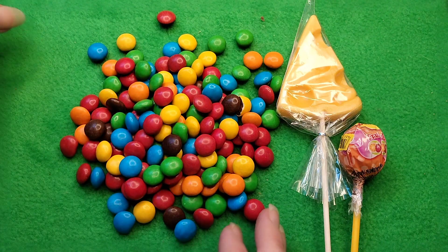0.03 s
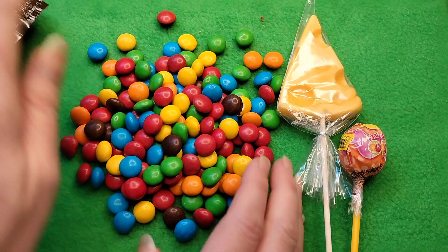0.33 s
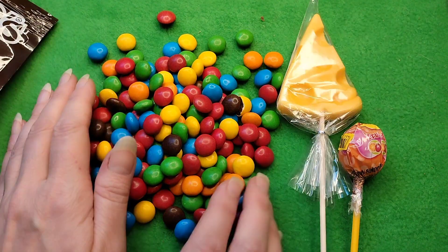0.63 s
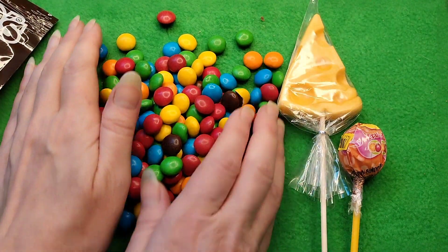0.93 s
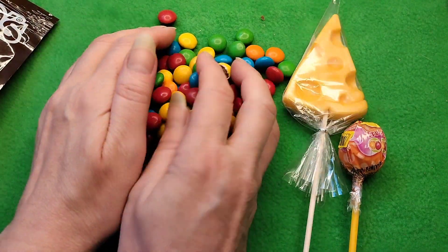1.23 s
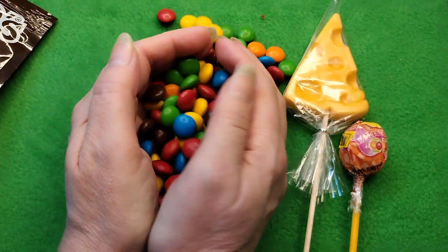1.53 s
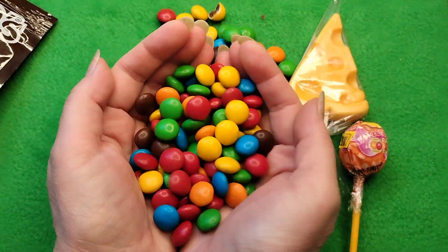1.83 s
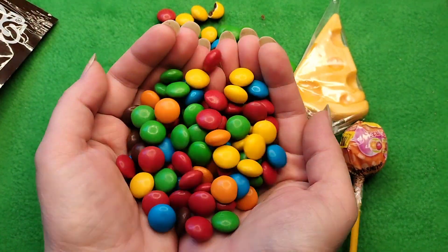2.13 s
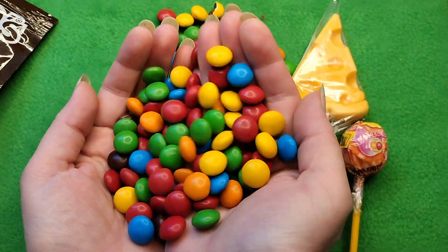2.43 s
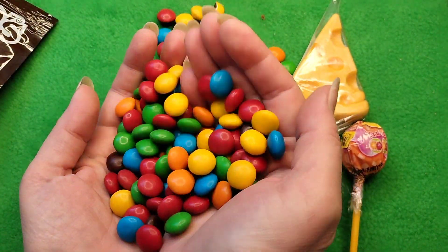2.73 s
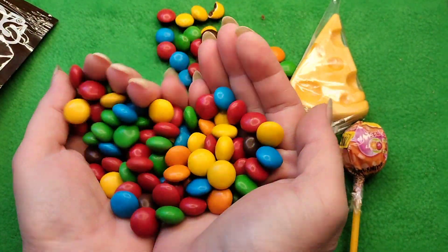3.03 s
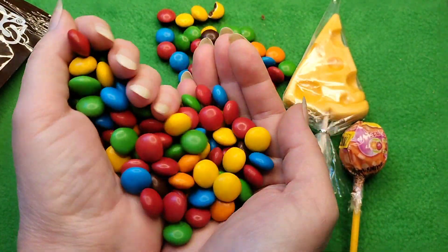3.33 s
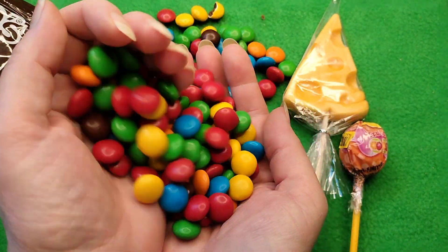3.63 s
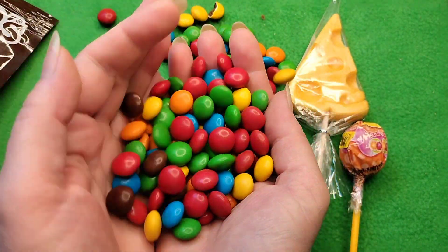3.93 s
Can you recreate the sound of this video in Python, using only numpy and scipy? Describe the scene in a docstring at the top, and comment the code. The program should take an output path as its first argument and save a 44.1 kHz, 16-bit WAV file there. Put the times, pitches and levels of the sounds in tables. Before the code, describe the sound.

Small hard candies rattle and clack as hands gather and scoop them from a table.

```python
"""Two hands gather sugar-shelled candies on a cloth-covered table in a small quiet room.
First a wrapped packet is nudged aside: it crackles and knocks on the table. From 0.8 s the hands sweep
the candies together, grinding them softly over the cloth, then scoop them up and tip them from palm to
palm. Hundreds of tiny shell contacts swell and ebb with the hands, and hard clacks stand out, loudest
near the end. The right microphone is nearer."""
import sys
import numpy as np
from scipy import signal
from scipy.io import wavfile
from scipy.ndimage import uniform_filter1d

SR = 44100
rng = np.random.default_rng(int(sys.argv[2]) if len(sys.argv) > 2 else 0)


def put_to_file(sound):
    """Save the sound as 16-bit audio at rate SR, in the file named by the first command-line argument."""
    columns = np.atleast_2d(sound).T  # one column per channel
    safe = np.clip(columns, -1, 1)
    whole_steps = np.round(safe * 32767)
    wavfile.write(sys.argv[1], SR, whole_steps.astype(np.int16))


N = 176400


def amp(db):
    """Decibels to gain."""
    return 10 ** (np.asarray(db) / 20)


def unit(x):
    """Scales to rms 1."""
    return x / np.sqrt(np.mean(x ** 2) + 1e-20)


def sized(hit, db):
    """Scales a click so that its right-channel energy, spread over 3 ms, has the given level."""
    return amp(db) * hit / np.sqrt((hit[1] ** 2).sum() / (0.003 * SR))


def at_hz(points, hz):
    """Interpolates a table on a log-frequency axis."""
    freqs, values = np.transpose(points)
    return np.interp(np.log(hz + 1), np.log(freqs), values)


def follow(points):
    """Every column of a time curve, sample by sample."""
    times, *columns = np.transpose(points)
    return [np.interp(np.arange(N) / SR, times, column) for column in columns]


def add(mix, start_s, sound):
    """Mixes a stereo sound in."""
    part = mix[:, round(start_s * SR):][:, :sound.shape[1]]
    part += sound[:, :part.shape[1]]


def colour(x, spectrum, size=2048):
    """Minimum-phase filter: clicks keep their sharp front."""
    log_gain = np.log(amp(at_hz(spectrum, abs(np.fft.fftfreq(size, 1 / SR)))))
    taps = np.fft.ifft(np.exp(np.conj(signal.hilbert(log_gain)))).real[:size // 2]
    return signal.oaconvolve(x, taps[None], axes=1)[:, :x.shape[1]]


def band(x, lo_hz, hi_hz):
    """Zero-phase band-pass."""
    sos = signal.butter(2, [lo_hz, min(hi_hz, SR / 2.1)], "band", fs=SR, output="sos")
    return signal.sosfiltfilt(sos, x, padtype=None)


def resonate(x, hz, width_hz):
    """One resonance of gain 1."""
    return signal.lfilter(*signal.iirpeak(hz, hz / width_hz, SR), x)


def contact(echo_db=-5, ring_share=0.28, size=900, modes=7):
    """One collision at both microphones: a tick, brief modes of random pitch, and close echoes."""
    tick_s, ring_t60_s, echo_t60_s, coherence = 0.00011, 0.016, 0.03, 0.79
    t = np.arange(size) / SR
    rise = 1 - np.exp(-(t / (2 * tick_s)) ** 2)
    ticks, echoes = rng.standard_normal((2, 2, size))
    ticks = ticks * (t / tick_s) ** 2 * np.exp(-t / tick_s)
    echoes = echoes * rise * amp(-60 * t / echo_t60_s)
    mode_hz = rng.uniform(1064, 15676, (modes, 1))
    tones = np.sin(2 * np.pi * (mode_hz * t + rng.random((2, modes, 1))))
    rings = rise * tones.sum(1) * amp(-60 * t / ring_t60_s)
    near, unrelated = [
        np.sqrt(1 - ring_share) * unit(tick) + np.sqrt(ring_share) * unit(ring)
        + amp(echo_db) * unit(echo) for tick, ring, echo in zip(ticks, rings, echoes)]
    far = coherence * near + np.sqrt(1 - coherence ** 2) * unrelated
    lag_s = max(rng.normal(0.00019, 0.00005), 0)
    return np.array([np.pad(far, (round(lag_s * SR), 0))[:size], near])


def chatter(max_gap_s=0.0038, graze=0.59, rebound=0.42):
    """A light contact: surfaces graze, meet, and touch once more."""
    x = np.zeros((2, 1400))
    for start_s, gain in zip(np.cumsum(rng.uniform(0, max_gap_s, 3)), [graze, 1, rebound]):
        add(x, start_s, gain * contact())
    return x


def shower(per_s, spread_db=5, shape_count=160):
    """Random light contacts of uneven size, with a steady mean power."""
    onsets = rng.random(N) < per_s / SR
    gains = onsets * amp(spread_db * np.minimum(rng.standard_normal(N), 2))
    gains /= np.sqrt(abs(uniform_filter1d(gains ** 2, size=1100)) + 1e-4)
    choice = rng.integers(0, shape_count, N)
    shapes = [chatter() for _ in range(shape_count)]
    x = np.zeros((2, N))
    for i in np.flatnonzero(gains):
        add(x, i / SR, gains[i] * shapes[choice[i]])
    return x


# Each row: frequency in Hz, T60 in seconds.
ROOM_DECAY = [(200, 0.16), (1000, 0.15), (3000, 0.16), (6000, 0.12), (15000, 0.026)]

def room(x, tail_db=-15, build_s=0.0027):
    """Adds the room's short tail; the treble dies first."""
    size = SR // 2
    noise = rng.standard_normal((2, size)) * np.minimum(np.arange(size) / SR / build_s, 1)
    hz, t, bins = signal.stft(noise, SR, nperseg=256)
    decay = amp(-60 * t / at_hz(ROOM_DECAY, hz)[:, None])
    tail = signal.istft(bins * decay, SR, nperseg=256)[1]
    return x + amp(tail_db) * signal.oaconvolve(x, tail / np.linalg.norm(tail[0]), axes=1)[:, :N]


# Each row: frequency in Hz, gain in dB.
AIR_SPECTRUM = [(25, -10), (55, -7.5), (130, 1.5), (250, -0.5), (600, -6.5), (1500, -14), (5000, -23.5),
                (15000, -31)]

def air(noise_db=-83, hum_hz=102, hum_db=-89):
    """Faint room noise and a low, wavering hum."""
    left, right, both = rng.standard_normal((3, N))
    noise = unit(colour(np.array([left, right]) + 0.34 * both, AIR_SPECTRUM))
    waver = unit(band(rng.standard_normal(N), 0.58 * hum_hz, 0.87 * hum_hz))
    hum = unit(np.sin(2 * np.pi * hum_hz * np.arange(N) / SR) + 0.15 * waver)
    return amp(noise_db) * noise + amp(hum_db) * hum


# Each row: start in seconds, length in seconds, relative level in dB, centre in Hz, relative width.
BRUSHES = [(.138, 0.042, -74.5, 4460, 0.79), (0.14, 0.04, -74, 900, 0.43), (0.187, 0.033, -77.5, 396, 0.31),
           (.227, 0.11, -75.5, 750, 2.1), (1.15, 0.031, -61, 1170, 0.22), (1.161, 0.023, -75.5, 397, 0.37),
           (2.334, .025, -64, 1180, 0.18), (3.328, 0.034, -71.5, 180, 0.31), (3.686, 0.021, -60, 795, 0.46)]

def hands():
    """Skin brushes cloth and candies: soft scuffs that rise quickly and fade."""
    x = np.zeros((2, N))
    for start_s, length_s, db, hz, width in BRUSHES:
        progress = np.arange(round(length_s * SR)) / (length_s * SR)
        envelope = np.sin(np.pi * np.sqrt(progress))
        noise = band(rng.standard_normal((3, SR // 4)), hz / (1 + width), hz * (1 + width))
        left, right, both = noise[:, -len(progress) - 2000:-2000]  # clear of the filter's edges
        scuff = unit(np.array([left, right]) + 1.4 * both) * envelope
        add(x, start_s, amp(db) * scuff * amp([[-2.5], [1.5]]))
    return room(x)


# Heap sliding on the cloth. Each row: time in seconds, relative level in dB.
PUSH_LEVEL = [(.8, -110), (.92, -80), (1.1, -85), (1.2, -76.5), (1.4, -72.5), (1.7, -73), (2.0, -73),
              (2.25, -73), (2.45, -110)]
# Each row: frequency in Hz, gain in dB.
GRIND_SPECTRUM = [(100, -19), (500, -16.5), (850, -7.5), (1150, -0.5), (1400, -6.5), (1750, -15.5),
                  (2300, -6), (5000, -38)]

def scrape():
    """The pushed heap grinds softly over the cloth, sounding the table top."""
    grind = unit(colour(shower(per_s=900), GRIND_SPECTRUM)) * amp(follow(PUSH_LEVEL)[0])
    return room(grind * amp([[-2], [1]]))


# Each row: frequency in Hz, relative level in dB, T60 in seconds.
TABLE_MODES = [(198, -9.5, 0.13), (279, -12.5, 0.06), (375, -6, 0.065), (493, -4, 0.037), (777, -4, 0.048),
               (930, -2, 0.044), (1086, -0.5, 0.1), (1214, -11, 0.099), (1770, -6, 0.022),
               (2510, -8, 0.062)]
# Each row: frequency in Hz, gain in dB.
THUD_SPECTRUM = [(80, -4), (220, 7), (1100, -3), (2800, -0.5), (4000, -20.5), (8000, -18), (14000, -27)]

def knock(thud_s=0.0063, thud_db=2, ring_db=-6):
    """The packet hits the table: a thud and the ringing top, to the right."""
    t = np.arange(SR // 4) / SR
    ring = sum((-1) ** k * amp(db - 60 * t / t60_s) * np.sin(2 * np.pi * hz * t)
               for k, (hz, db, t60_s) in enumerate(TABLE_MODES))
    thud = colour(rng.standard_normal((1, len(t))) * np.exp(-t / thud_s), THUD_SPECTRUM)
    return (amp(ring_db) * ring + amp(thud_db) * thud / abs(thud).max()) * amp([[-6], [0]])


# Each row: frequency in Hz, gain in dB.
WRAPPER_SPECTRUM = [(100, -35), (700, -26.5), (1000, -9.5), (1230, -4.5), (1550, -8), (2600, 0.5),
                    (3800, -1.5), (5000, -5), (7300, -1), (9500, -23), (15500, -32)]
# Each row: time in seconds, relative level in dB.
SLIDE_LEVEL = [(.34, -93), (.362, -64.5), (.4, -70), (.42, -52), (.46, -60), (.51, -69), (.55, -54.5),
               (0.611, -59), (.642, -48), (.68, -61), (.71, -79), (.76, -82)]
# Each row: start in seconds, relative crack and ring levels in dB, ring pitch in Hz.
WRAPPER_SNAPS = [(0.2776, -57.5, -55, 1780), (0.454, -62, -49, 2500), (.474, -59, -51.5, 3270),
                 (0.4843, -45.5, -55.5, 1230), (0.5193, -54, -62, 1810), (0.5452, -52, -50, 1200),
                 (0.5612, -42, -37, 2720), (.629, -52, -57, 4300), (0.641, -39, -42, 2480),
                 (0.6416, -37.5, -38.5, 3760), (.663, -64, -50.5, 1800), (0.6723, -39.5, -51, 2600),
                 (0.7906, -62, -61.5, 2950), (1.165, -64, -53.5, 1140), (1.1701, -50, -52, 2680)]
# Each row: start in seconds, relative level in dB.
KNOCKS = [(0.142, -62), (0.277, -56), (0.559, -37.5)]

def packet(slide_gain_db=-4, crack_gain_db=1.5):
    """The wrapper crinkles and snaps as the packet slides and knocks on the table."""
    t = np.arange(N) / SR
    sliding = (t > SLIDE_LEVEL[0][0]) & (t < SLIDE_LEVEL[-1][0])
    crinkle = unit(colour(shower(per_s=1500), WRAPPER_SPECTRUM))
    x = crinkle * amp(follow(SLIDE_LEVEL)[0] + slide_gain_db) * sliding
    for start_s, crack_db, ring_db, hz in WRAPPER_SNAPS:
        tick = colour(contact(echo_db=-12.5, ring_share=0), WRAPPER_SPECTRUM)
        crack = sized(tick, crack_db + crack_gain_db)
        add(x, start_s, crack + sized(resonate(crack, hz, width_hz=174), ring_db))
    for start_s, db in KNOCKS:
        add(x, start_s, amp(db) * knock())
    return room(x * amp([[-0.8], [0.6]]))


# Shell contact. Each row: frequency in Hz, gain in dB.
SHELL_SPECTRUM = [(100, -38), (300, -37.5), (700, -35), (1200, -26), (2000, -21.5), (2700, -10),
                  (3300, -10), (3900, -3.5), (4700, -7.5), (5800, -0.5), (6350, -3.5), (6900, .5),
                  (7350, 0), (8000, -10), (9500, -23.5), (11000, -22), (12000, -16.5), (13000, -24.5),
                  (15500, -20.5)]
# Each row: time in seconds, relative rattle level in dB.
STIR_LEVEL = [(0.813, -79.5), (0.828, -73.5), (0.843, -67), (0.918, -54.5), (0.968, -60.5), (1.013, -59),
              (1.028, -66.5), (1.142, -56), (1.167, -50.5), (1.217, -51), (1.272, -44), (1.297, -50.5),
              (1.402, -43.5), (1.432, -42.5), (1.571, -29), (1.601, -33.5), (1.626, -29.5), (1.656, -35),
              (1.771, -30), (1.821, -38.5), (1.871, -33), (1.891, -49), (1.956, -45), (1.976, -43.5),
              (2.13, -46.5), (2.145, -34), (2.19, -63), (2.21, -45), (2.245, -57.5), (2.315, -47),
              (2.41, -54.5), (2.484, -39.5), (2.559, -56.5), (2.569, -41), (2.654, -40.5), (2.714, -46.5),
              (2.779, -34), (2.903, -45.5), (2.948, -37), (3.058, -50.5), (3.068, -43.5), (3.178, -31),
              (3.253, -40.5), (3.273, -54), (3.312, -56), (3.335, -56), (3.412, -59), (3.417, -44),
              (3.457, -33), (3.472, -40), (3.537, -34.5), (3.582, -37), (3.717, -24), (3.745, -28),
              (3.815, -21.5), (3.885, -27), (3.931, -27), (3.971, -38), (3.996, -34.5)]
# Space around the heap. Each row: time in seconds, relative hollow and low ring levels in dB.
CUP_RESONANCE = [(0.85, -15.5, -44), (1.1, -8, -8), (1.3, -3, -40), (1.55, -7, -21.5), (1.75, -3, -14),
                 (2.0, -2, -11), (2.3, -5, -20), (2.42, -6, -26), (2.52, -2, -29.5), (2.8, -2, -21.5),
                 (3.0, 0.5, -19), (3.15, -2.5, -17.5), (3.45, -4, -24.5), (3.65, -3.5, -22),
                 (3.83, -7.5, -21.5), (4.0, -0.5, -25)]

def rattle(gain_db=-2, hollow_gain_db=5, low_gain_db=22, rate_doubling_db=20):
    """The stirred heap rattles faster as it gets louder; cupped hands make it ring hollower."""
    level_db, = follow(STIR_LEVEL)
    hollow_db, low_db = follow(CUP_RESONANCE)
    contacts_per_s = 800 * 2 ** ((level_db + 38.5) / rate_doubling_db)
    shells = unit(colour(shower(contacts_per_s), SHELL_SPECTRUM))
    hollow = (amp(hollow_db + hollow_gain_db) - 1) * band(shells, 2870, 5100)
    low = (amp(low_db + low_gain_db) - 1) * band(shells, 1030, 1930)
    stirring = np.arange(N) / SR > STIR_LEVEL[0][0]
    return (shells + hollow + low) * amp(level_db + gain_db) * stirring


# Each row: start in seconds, ping level in dB, hollow ring level in dB.
CLACKS = [(0.9057, -53.5, -74), (1.2343, -43.5, -57.5), (1.4478, -34.5, -47), (1.7519, -20.5, -36.5),
          (1.844, -31.5, -37), (1.8575, -34, -41), (1.8655, -27, -42), (1.9322, -38, -55),
          (1.9465, -48, -48), (1.9667, -45, -46), (1.9884, -31.5, -41.0), (1.9914, -39, -42),
          (2.0027, -35, -37), (2.023, -27.5, -44), (2.0386, -36, -35), (2.0686, -37, -49),
          (2.0967, -35, -37.5), (2.1409, -34.5, -38.5), (2.1577, -39, -42), (2.179, -41, -47.0),
          (2.202, -45, -56), (2.286, -36, -52), (2.3074, -41.5, -47.5), (2.4176, -45, -58),
          (2.4853, -40, -52), (2.561, -54, -39), (2.5904, -40, -41), (2.6275, -46, -41),
          (2.715, -42.5, -28), (2.7285, -38, -34), (2.776, -45, -34), (2.7812, -37, -42),
          (2.8154, -32, -36), (2.839, -31, -48), (2.8668, -34.5, -43.5), (2.92, -32.5, -46),
          (2.9578, -32.5, -48), (3.0606, -38.5, -54), (3.09, -36, -44.5), (3.132, -25.5, -35.5),
          (3.1396, -25.5, -44), (3.1746, -32, -51), (3.3092, -28.5, -36), (3.4006, -43, -47),
          (3.424, -37, -49), (3.448, -36, -38), (3.523, -30, -41), (3.6129, -22.5, -40.0),
          (3.6276, -25.5, -34), (3.7314, -26, -39), (3.7598, -21, -38), (3.764, -19.5, -35),
          (3.778, -28, -39), (3.7841, -23, -40), (3.7943, -23, -41), (3.8004, -23.5, -41),
          (3.8179, -20.5, -40), (3.8242, -26, -30), (3.8336, -27, -24.5), (3.8478, -21.5, -28.5),
          (3.9011, -21, -36), (3.9155, -32, -36), (3.9715, -29, -40.5)]

def clacks(tick_db=-13.5, graze_db=-17, max_lead_s=0.0037):
    """Hard collisions: a light graze, then a bright ping of its own pitch over a hollow ring."""
    x = np.zeros((2, N))
    for start_s, ping_db, hollow_db in CLACKS:
        tick = colour(contact(echo_db=-21, ring_share=0.08), SHELL_SPECTRUM)
        ping = resonate(tick, hz=rng.normal(6760, 570), width_hz=650) + amp(tick_db) * tick
        hollow = resonate(tick, hz=3970, width_hz=1200)
        add(x, start_s, sized(ping, ping_db) + sized(hollow, hollow_db))
        lead_s = max_lead_s * rng.uniform(0.4, 1.0)
        graze = colour(contact(), SHELL_SPECTRUM)
        add(x, start_s - lead_s, sized(graze, ping_db + graze_db))
    return x


# Each row: frequency in Hz, gain in dB.
PALM_SPECTRUM = [(60, -18), (200, -2), (900, 2.5), (2000, -1), (4000, -34), (12000, -45)]
# Each row: start in seconds, level in dB.
PALM_DROPS = [(2.2859, -60.5), (3.3099, -53)]

def palm_taps():
    """Single candies drop into the palm with a dull tap."""
    x = np.zeros((2, N))
    tap = colour(np.array([signal.unit_impulse(700)] * 2), PALM_SPECTRUM)
    for start_s, db in PALM_DROPS:
        add(x, start_s, sized(tap, db))
    return x


# Left microphone against the right. Each row: frequency in Hz, gain in dB.
FAR_SIDE = [(200, 2.5), (1200, -7), (2700, -5), (4200, -6.5), (5800, -8.5), (7100, -14), (8800, 2),
            (10000, -0.5), (12000, -6), (15500, -10.5)]

def candies():
    """The handled candies in the room, weaker at the farther, left microphone."""
    x = room(rattle() + clacks() + palm_taps(), tail_db=-14)
    return np.vstack([colour(x[:1], FAR_SIDE), x[1:]])


def scene():
    """Everything on the table, in the quiet room."""
    return candies() + scrape() + packet() + hands() + air()


def record(dry, low_hz=45, high_hz=15950):
    """Bass cut and band limit."""
    bass_cut = signal.butter(2, low_hz, "high", fs=SR, output="sos")
    band_limit = signal.firwin(511, high_hz, window=("kaiser", 9), fs=SR)
    return signal.oaconvolve(signal.sosfilt(bass_cut, dry), band_limit[None], "same")


dry = scene()
out = record(dry)
put_to_file(out)
```